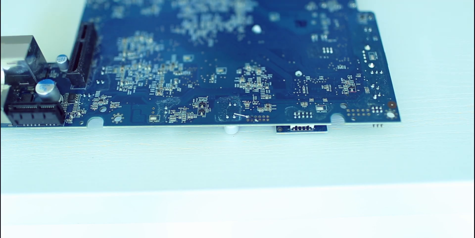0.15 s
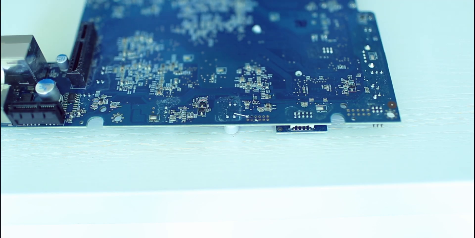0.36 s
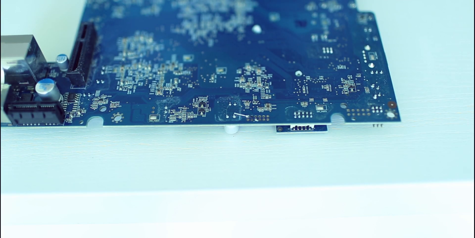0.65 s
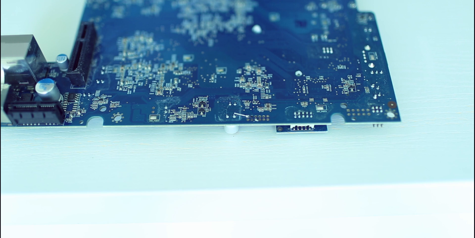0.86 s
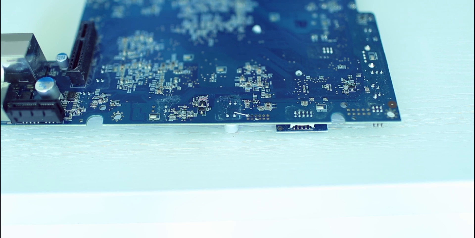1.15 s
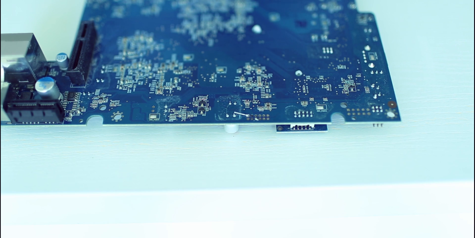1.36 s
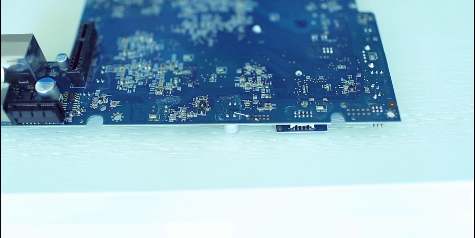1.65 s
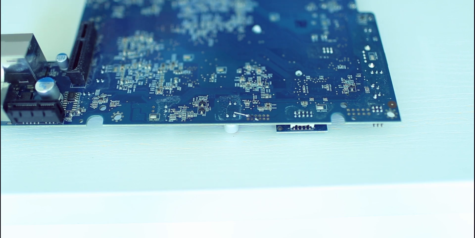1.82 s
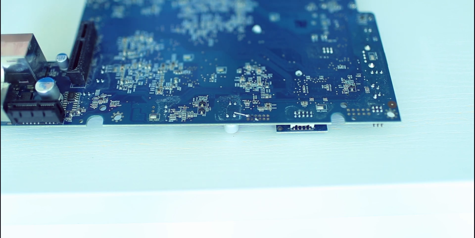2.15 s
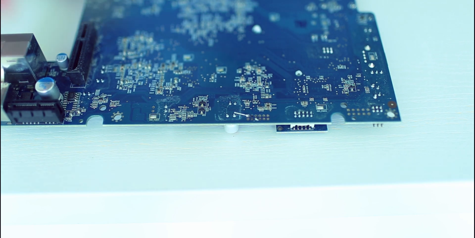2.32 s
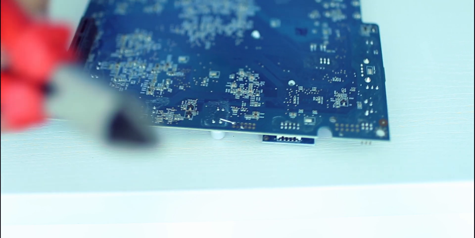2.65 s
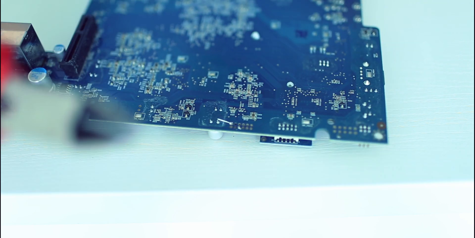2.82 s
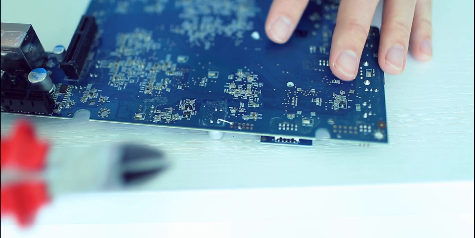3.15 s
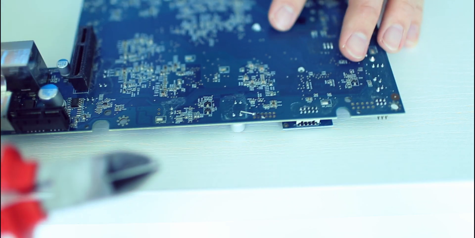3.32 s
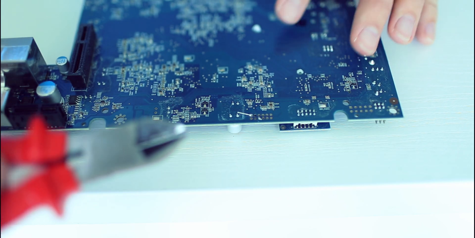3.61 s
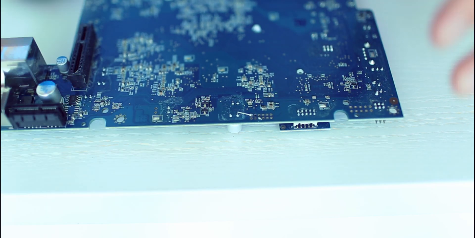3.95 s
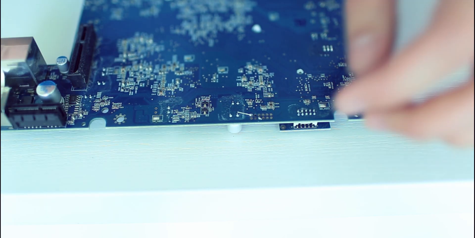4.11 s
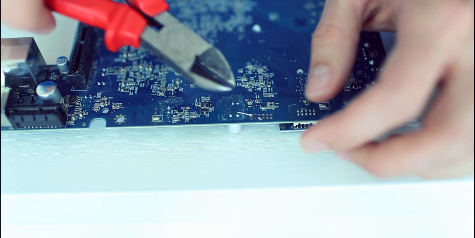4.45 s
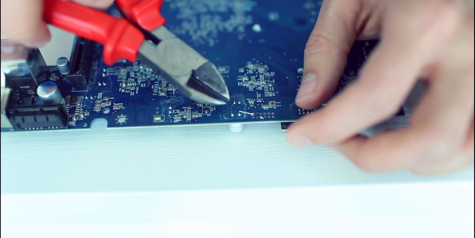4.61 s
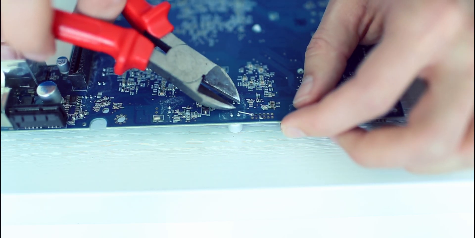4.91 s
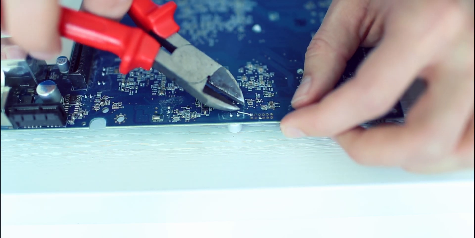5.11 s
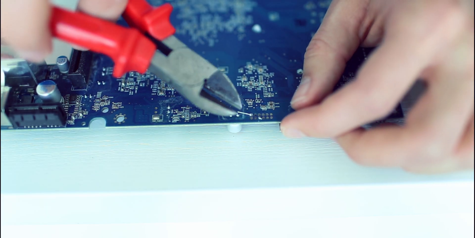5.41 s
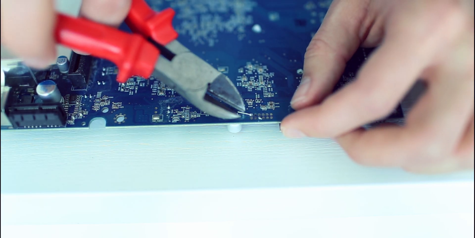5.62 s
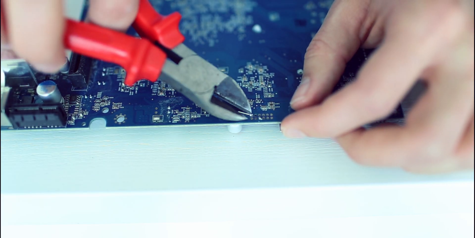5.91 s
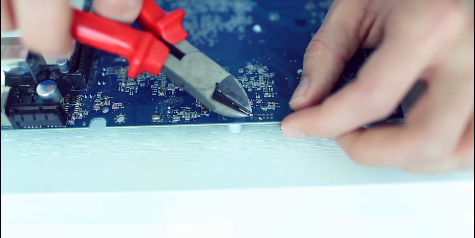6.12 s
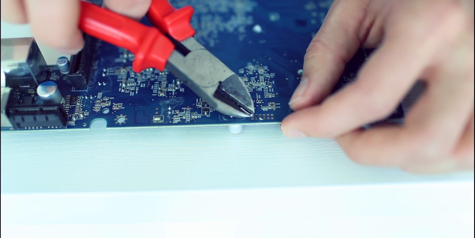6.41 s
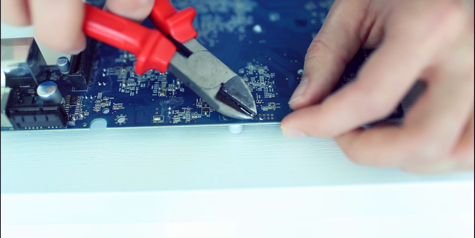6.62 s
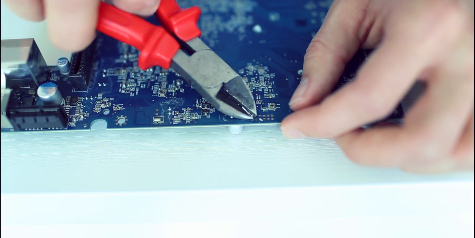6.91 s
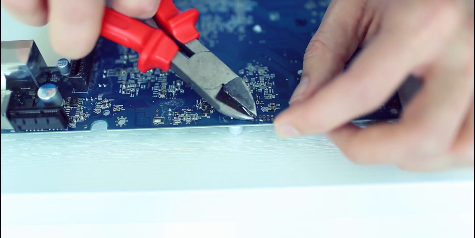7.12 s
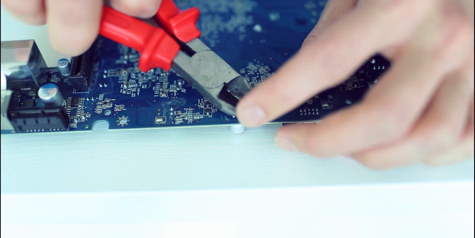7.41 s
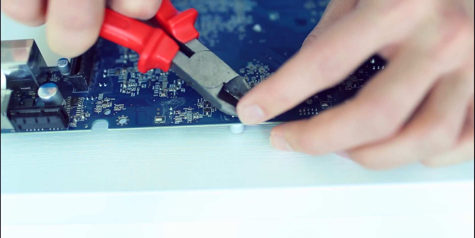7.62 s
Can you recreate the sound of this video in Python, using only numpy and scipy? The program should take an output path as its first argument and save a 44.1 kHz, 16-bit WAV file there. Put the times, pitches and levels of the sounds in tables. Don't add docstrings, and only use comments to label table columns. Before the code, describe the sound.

Quickening hollow knocks end in a flat thump, followed by a short squeaky board drag, clattering set-down, light taps and bright metal clicks.

```python
import sys
import numpy as np
from scipy import signal
from scipy.io import wavfile
from scipy.ndimage import uniform_filter1d

SR = 44100
rng = np.random.default_rng(int(sys.argv[2]) if len(sys.argv) > 2 else 0)


def unload_audio(sound):
    columns = np.transpose(np.atleast_2d(sound))
    steps = np.round(np.clip(columns, -1, 1) * 32767)
    wavfile.write(sys.argv[1], SR, steps.astype(np.int16))


def linear_from_db(decibels):
    return 10 ** (np.asarray(decibels, float) / 20)


N = 342216

# start in seconds, peak in dB, pitch in Hz, rebound in dB.
LANDINGS = [(0.879, -17.5, 580, -4), (1.035, -16, 580, -6), (1.238, -20, 568, -8.5), (1.359, -16, 561, -21),
            (1.501, -27.5, 600, -25), (1.608, -20.5, 580, -4.5), (1.733, -29, 646, -16),
            (1.82, -23.5, 630, -15.5), (1.926, -36, 660, -10), (1.999, -28.5, 671, -9.5),
            (2.092, -42, 670, -9.5), (2.156, -35.5, 675, -9)]
# pitch in Hz, level in dB, time to fade by 60 dB in seconds.
HOLLOW_MODES = [(533, 3, 0.095), (255, -9, .14), (700, -4, .05)]
# pitch in Hz, level in dB, time to fade by 60 dB in seconds.
BENCH_MODES = [(975, -22, .06), (1130, -25, .05), (1430, -26, .05), (1520, -30, .04), (1950, -38, .04),
               (2950, -42, .03)]
# start in seconds, peak in dB, pitch in Hz, rattle in dB, rattle fade in seconds.
BLOWS = [
    (2.248, -8, 620, -21, 0.48),
    (4.354, -32, 620, -6, 0.096),
]
# time of the peak in seconds, peak in dB, rise in seconds,
# fall in seconds, loudest region in Hz.
JERKS = [(2.586, -31, 0.022, 0.13, 1510), (2.602, -23.5, 0.035, .1, 2100),
         (2.622, -18.5, 0.039, 0.11, 2050), (2.632, -29.5, 0.027, 0.4, 600),
         (2.668, -21.5, 0.072, 0.045, 1720), (2.689, -32.5, 0.12, 0.21, 3000),
         (2.716, -25.5, 0.16, .08, 1800), (2.757, -28, 0.091, 0.15, 1390)]
# time of the peak in seconds, peak in dB,
# rise in seconds, fall in seconds, loudest region in Hz.
SHORT_SKIDS = [(2.559, -55, 0.075, .1, 1800), (2.835, -40.5, 0.029, 0.27, 2380),
               (3.235, -38, .03, .1, 1110), (3.266, -18, 0.053, 0.11, 1104), (3.339, -16, .006, .1, 1694),
               (3.355, -22.5, .05, 0.0504, 4000), (3.371, -14, 0.02, 0.14, 1048),
               (3.448, -24.5, 0.01, 0.18, 1390), (3.55, -43.5, .15, .1, 1150),
               (3.58, -34, 0.0074, 0.2, 1100), (4.574, -45, 0.0046, 0.069, 1150),
               (4.655, -49, 0.068, 0.064, 1133), (4.81, -55.5, 0.023, 0.083, 1490),
               (4.861, -44, 0.061, 0.074, 1324), (5.214, -38, 0.028, 0.24, 990),
               (5.704, -36, .05, 0.21, 1360), (5.745, -50, 0.05, 0.14, 1290),
               (5.773, -32, 0.021, 0.06, 1440), (5.83, -62.5, 0.023, 0.31, 1340),
               (6.393, -42.5, 0.017, 0.044, 1220), (7.322, -37, 0.053, .12, 1370)]
# pitch in Hz, level in dB, time to fade by 60 dB in seconds.
BOARD_MODES = [(580, -10, 0.1065), (666.2, -1, 0.064), (743.5, -8.5, 0.16), (807.4, -2.5, 0.12),
               (956, -2, 0.19), (1030, -13, 0.18), (1150, -9.5, 0.33), (1220, -0.5, 0.096),
               (1355, 5, 0.026), (1509, -10.5, 0.041), (1405, -8, 0.064), (1613, -7.5, 0.089),
               (2048, 7, 0.026), (2196, -6, 0.0087), (2000, -12, 0.015), (2500, -2.5, 0.037),
               (2763, -8.5, .06), (3122, -3.5, 0.019), (2870, -24.5, 0.018), (3375, -5.5, 0.017),
               (3900, -22, 0.09), (4260, -4.5, .03), (5000, -32.5, .03), (5680, -15, 0.038),
               (7400, -32.5, .02), (8900, -26, .02), (9950, -44, 0.02), (12770, -61, .012),
               (15700, -38.5, 0.00974)]
# pitch in Hz, time to fade by 60 dB in seconds.
SQUEAK_MODE = (1357, 0.3)
# start in seconds, peak in dB, loudest region in Hz, breadth in octaves.
BOARD_TAPS = [(0.084, -32.5, 1350, 2), (3.335, -14.5, 980, 3.7), (3.368, -33, 1220, 1.6),
              (3.442, -12, 2030, 1.6), (3.576, -14.5, 1400, 2.02), (4.57, -26.5, 1090, 0.96),
              (4.851, -43, 1070, 1.1), (4.874, -15, 2300, 2.2), (4.895, -31.5, 2180, 5.5),
              (5.041, -47, 1190, 1.3), (5.173, -34, 920, 0.95), (5.21, -28, 890, 4.8),
              (5.69, -27.5, 2330, 1.3), (5.704, -25.5, 820, 2.2), (5.767, -20, 960, 2.26),
              (5.997, -56, 904, 1.4), (6.028, -36, 895, 1.3), (6.104, -47, 1560, 0.8),
              (6.173, -45.5, 1220, 4.7), (6.387, -33, 955, 1.05), (6.555, -46.5, 1243, 3.2),
              (6.716, -56.5, 1150, 1.7), (7.124, -49.5, 2130, 1.9), (7.15, -41, 1156, 0.22),
              (7.154, -48.5, 3300, 0.64), (7.315, -22, 1376, 0.42), (7.494, -54, 1190, 1.3),
              (7.6, -61, 1197, 1.3)]
# pitch in Hz, level in dB, time to fade by 60 dB in seconds.
JAW_MODES = [(1596, -9.5, 0.18), (2180, 3, 0.058), (3000, -4.5, 0.11), (3950, -13, 0.054),
             (4080, -23.5, 0.016), (4900, 7, 0.0059), (6150, 9, 0.0127), (6160, -19.5, 0.042),
             (7120, 14.5, 0.012), (8300, -21.5, 0.018), (8690, 8.5, 0.026), (10200, -2.5, 0.058),
             (12860, -28, 0.042)]
# start in seconds, peak in dB, loudest region in Hz, breadth in octaves,
# grit in dB.
JAW_CLICKS = [(1.1364, -50, 8900, 0.66, -24), (1.1541, -48.5, 7760, 0.64, -13),
              (1.5394, -45, 4830, 3.3, -6), (1.5668, -26.5, 7900, 3.7, -15.5),
              (1.9812, -47.5, 2990, 4.6, -11), (5.2529, -39, 3160, 2.16, -34.5),
              (5.2641, -11, 6770, 2.2, -34), (5.2673, -17.5, 3000, 1.4, -16.5),
              (5.3012, -21.5, 4000, 0.88, -25), (5.3009, -17.5, 2090, 2.8, -35),
              (5.6884, -40.5, 2376, 1.28, -31)]
# time in seconds, level in dB.
STIR_LEVELS = [(0.0, -68), (0.28, -69.5), (1.88, -72), (2.33, -63), (2.83, -65.5), (3.11, -78), (3.31, -55),
               (3.46, -52), (3.72, -76), (5.1, -69), (5.49, -69.5), (6.18, -73.5), (6.35, -71.5),
               (6.83, -80.5), (7.28, -71.5), (7.76, -78.5)]
# pitch in Hz, level per Hz in dB.
MIDDLE_HUSH = [(12, -44.5), (20, -15), (102, -17.5), (139, -7), (195, -11), (305, -17), (440, -15),
               (520, -11.5), (816, -18.5), (1110, -15), (1650, -19.5), (1900, -19), (8170, -24.5),
               (15200, -27), (16500, -37)]
# pitch in Hz, level per Hz in dB.
WIDE_HUSH = [(12, -21.5), (20, -9), (60, -2.5), (151, -11), (273, -6.5), (323, -11.5), (7940, -13),
             (15200, -16), (16500, -26.5)]
# pitch in Hz, time to fade by 60 dB in seconds.
ROOM_FADE = [(150, 1), (400, 0.82), (1000, 0.36), (2800, 0.46), (7000, 0.49), (14000, 0.37)]

CONTACT_S, UPPER_DB, HOLLOW_DB, HOLLOW_DB_PER_HZ = .0045, 6.5, -6.5, -0.047
REBOUND_S, CHATTER_DB, CHATTER_T60_S = .0078, -19.5, .28
SLIDE_SQUEAK_DB, SLIDE_OCTAVES = -1.5, 0.9
SKID_SQUEAK_DB, SKID_OCTAVES = -16.5, 1.46
JERK_RANGE_DB, GRIT_DB, GRIT_GROWTH = 45.5, -23, 1.175
CRACK_DB, CRACK_DB_PER_OCTAVE, CRACK_GROWTH = -47.5, 8, 1
THUMP_DB, THUMP_DB_PER_OCTAVE = -34.5, 3.5
TAP_SCATTER_DB, JAW_SCATTER_DB = 3, 3
BOARD_ROOM_REACH = .6


def evened(x):
    return x / np.sqrt(np.mean(x ** 2) + 1e-20)


def peaked(x):
    return x / (abs(x).max() + 1e-20)


def passed(x, hz, kind, order=2):
    return signal.sosfilt(signal.butter(order, hz, kind, fs=SR, output="sos"), x)


def read(points, hz):
    f, value = np.transpose(points)
    return np.interp(np.log(hz + 1), np.log(f + 1), value)


def add(mix, s, sound):
    part = mix[round(s * SR):][:len(sound)]
    part += sound[:len(part)]


def contact_db(hz, centre_hz, octaves):
    return -12 * (np.log2(hz / centre_hz) / np.clip(octaves, .2, 9)) ** 2


def ring(hz, db, t60, rise_s, size=4096):
    t = np.arange(size)[:, None] / SR
    sign = (-1.) ** np.arange(np.size(hz))
    swell = 1 - np.exp(-(t / abs(rise_s)) ** 2)
    fade = linear_from_db(db - 60 * t / np.clip(t60, .004, .16))
    return (sign * swell * fade * np.sin(2 * np.pi * hz * t)).sum(1)


def struck(modes, db, centre_hz, octaves, chatter_s, luck, scatter_db, rise_s, damping):
    hz, mode_db, t60 = np.transpose(modes)
    mode_db = mode_db + contact_db(hz, centre_hz, octaves)
    detune, scatter = luck[:2, :len(hz)]
    body = ring(hz, mode_db + scatter_db * scatter, damping * t60, rise_s)
    body += ring(hz * (1 + 0.096 * detune), mode_db + 3.0, .6 * damping * t60, rise_s)
    late, hits = abs(luck[2, :12]), np.zeros(2048)
    at = np.clip(late * chatter_s * SR, 0, 2047).astype(int)
    hits[at] = 0.83 * luck[3, :12] * np.exp(-late)
    hits[0] = 1
    return linear_from_db(db) * peaked(signal.fftconvolve(body, hits)[:len(body)])


def rocking():
    out, t, chatter_t = np.zeros(N), np.arange(4096) / SR, np.arange(8192) / SR
    hollow_hz, hollow_mode_db, hollow_t60 = np.transpose(HOLLOW_MODES)
    bench_hz, bench_db, bench_t60 = np.transpose(BENCH_MODES)
    chatter = rng.standard_normal((len(LANDINGS), 8192))
    fade = linear_from_db(CHATTER_DB - 60 * chatter_t / CHATTER_T60_S) * np.minimum(chatter_t / .01, 1)
    swell = np.exp(-(t / CONTACT_S - 1.6) ** 2) * np.minimum(t / 0.00067, 1)
    for (s, peak_db, knock_hz, rebound_db), rattle in zip(LANDINGS, chatter):
        hollow_db = HOLLOW_DB + HOLLOW_DB_PER_HZ * (knock_hz - LANDINGS[0][2])
        foot = np.sin(2 * np.pi * knock_hz * t)
        octave_below = linear_from_db(-12.5) * np.sin(np.pi * .96 * knock_hz * t)
        knock = swell * (foot + octave_below)
        knock += ring(hollow_hz, hollow_mode_db + hollow_db, hollow_t60, 0.0024)
        knock += ring(bench_hz, bench_db + UPPER_DB, bench_t60, 0.004)
        add(out, s - .0005, linear_from_db(peak_db) * peaked(knock))
        loose = evened(passed(rattle, [.84 * knock_hz, 1.08 * knock_hz], "band"))
        add(out, s, linear_from_db(peak_db) * fade * loose)
        add(out, s + REBOUND_S, -linear_from_db(peak_db + rebound_db) * swell * foot)
    return room(passed(out, 190, "high"), -21, .5)


def drops():
    out, t = np.zeros(N), np.arange(SR // 2) / SR
    ratios, levels_db = np.array([0.942, 0.41, 0.83, 2.0]), np.array([9.0, -9.5, -11, -25])
    for s, db, hz, rattle_db, rattle_t60 in BLOWS:
        blow = peaked(ring(hz * ratios, levels_db, 0.011, 0.0003, size=len(t)))
        rattle = passed(rng.standard_normal(len(t)), 675, "low", order=1)
        rattle = evened(passed(passed(rattle, 3300, "low"), 280, "high"))
        rattle *= linear_from_db(rattle_db - 60 * t / rattle_t60) * (1 - np.exp(-t / 0.006))
        add(out, s + 0.00054, linear_from_db(db + 3.5) * (blow + rattle))
    return passed(out, 170, "high")


def slips():
    gate, size, sign = rng.random((N, 3)).T
    happens = gate < 6000 / SR
    return happens * linear_from_db(-2.5 * np.log(size + 0.00081)) * np.sign(sign - .5)


def drag(train, squeak_db, octaves, s, db, rise_s, fall_s, region_hz):
    lead = 2205
    first = round((s - rise_s) * SR)
    at = np.arange(first - lead, round((s + fall_s) * SR))
    part, t = train[at], at / SR - s
    hz, mode_db, t60 = np.transpose(BOARD_MODES)
    board = ring(hz, mode_db + contact_db(hz, region_hz, octaves), 0.6 * t60, 0.0001)
    board += abs(board).max() * ring(4150, -20, .014, .0002)
    sound = signal.fftconvolve(part, board)[:len(t)]
    squeak = signal.fftconvolve(part, ring(SQUEAK_MODE[0], 0, SQUEAK_MODE[1], 0.0054))[:len(t)]
    grit = passed(part, [3200, 9500], "band", order=2)
    sound, squeak, grit = (v / np.sqrt(uniform_filter1d(v ** 2, size=1200) + 1e-12)
                           for v in (sound, squeak, grit))
    level = linear_from_db(db - JERK_RANGE_DB * np.maximum(-t / rise_s, t / fall_s))
    jerk = level * (sound + linear_from_db(squeak_db) * squeak)
    jerk += linear_from_db(GRIT_DB) * level ** GRIT_GROWTH * grit
    return first / SR, jerk[lead:]


def slides():
    out, train = np.zeros(N), slips()
    for row in JERKS:
        add(out, *drag(train, SLIDE_SQUEAK_DB, SLIDE_OCTAVES, *row))
    for row in SHORT_SKIDS:
        add(out, *drag(train, SKID_SQUEAK_DB, SKID_OCTAVES, *row))
    return out


def taps():
    out, bench, t = np.zeros(N), np.zeros(N), np.arange(2048) / SR
    luck = rng.standard_normal((len(BOARD_TAPS), 4, 30))
    thump = peaked(ring(np.array([76.75, 144, 243, 404]), np.array([-12.5, 0, -5.5, 10]),
                        np.array([.2, 0.2, 0.0888, 0.05]), 0.00054))
    white = rng.standard_normal((len(BOARD_TAPS), len(t)))
    cracks = passed(white, [1500, 6500], "band", order=2) * linear_from_db(-60 * t / .04)
    for (s, db, hz, octaves), chance, crack in zip(BOARD_TAPS, luck, cracks):
        add(out, s, struck(BOARD_MODES, db, hz, octaves, .007, chance, TAP_SCATTER_DB, 0.00089, .48))
        crack_db = CRACK_DB + CRACK_GROWTH * db + CRACK_DB_PER_OCTAVE * octaves
        add(out, s, linear_from_db(crack_db) * peaked(crack))
        add(bench, s, linear_from_db(db + THUMP_DB + THUMP_DB_PER_OCTAVE * octaves) * thump)
    return out, bench


def clicks():
    out, t = np.zeros(N), np.arange(4096) / SR
    luck = rng.standard_normal((len(JAW_CLICKS), 4, 30))
    white = rng.standard_normal((len(JAW_CLICKS), len(t)))
    spray = passed(white, [3500, 10500], "band", order=3) * linear_from_db(-60 * t / .25)
    snaps = passed(white, [11500, 15000], "band") * linear_from_db(-60 * t / 0.056)
    for (s, db, hz, octaves, grit_db), chance, grit, snap in zip(JAW_CLICKS, luck, spray, snaps):
        steel = struck(JAW_MODES, db, hz, octaves, .003, chance, JAW_SCATTER_DB, 0.00027, 0.64)
        add(out, s, steel + linear_from_db(db + grit_db) * grit + linear_from_db(db - 19.5) * peaked(snap))
    return out


def room(x, wet_db, reach):
    echoes = np.zeros(SR // 2)
    at = np.arange(200, SR // 2 - 20, 20)
    echoes[at + rng.integers(0, 20, len(at))] = rng.choice([-1., 1.], len(at))
    hz, t, z = signal.stft(echoes, SR, nperseg=256)
    fade = linear_from_db(-60 * t / (reach * read(ROOM_FADE, hz)[:, None]))
    tail = signal.istft(z * fade, SR, nperseg=256)[1]
    return x + linear_from_db(wet_db) * signal.fftconvolve(x, tail / np.linalg.norm(tail))[:len(x)]


def noise(spectrum, patchy_db):
    frames, hz = N // 512 + 5, np.fft.rfftfreq(2048, 1 / SR)
    a, b, patches = rng.standard_normal((frames, 1025, 3)).T
    patches = uniform_filter1d(patches, size=12, axis=0)
    patches = evened(uniform_filter1d(patches, size=8, axis=1))
    z = (a + 1j * b) * linear_from_db(read(spectrum, hz)[:, None] + patchy_db * patches)
    return evened(signal.istft(z, nperseg=2048, noverlap=1536)[1][:N])


def stir():
    s, db = np.transpose(STIR_LEVELS)
    level = linear_from_db(np.interp(np.arange(N) / SR, s, db) + 4.5)
    colour = [(18, -4.5), (40, -10), (75, -6.0), (140, -3.5), (300, 1), (450, -12.5), (900, -53.5)]
    return level * noise(colour, 2.5)


def scene():
    knocks, bench = taps()
    board = room(knocks, -10.0, BOARD_ROOM_REACH) + room(slides(), -14.0, 0.19)
    board = passed(board, 440, "high", order=4)
    steel = passed(room(clicks(), -10.5, BOARD_ROOM_REACH), 800, "high")
    hush = linear_from_db(-63) * noise(MIDDLE_HUSH, 1.2)
    mid = rocking() + drops() + board + bench + steel + stir() + hush
    side = linear_from_db(-69.5) * noise(WIDE_HUSH, 0.52)
    return np.array([mid + side, mid - side])


def top_cut(x):
    return signal.sosfilt(signal.butter(12, 16640, fs=SR, output="sos"), x)


def record(dry):
    return top_cut(dry)


dry = scene()
out = record(dry)
unload_audio(out)
```